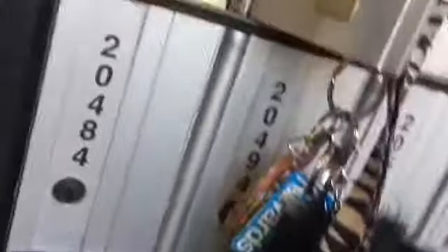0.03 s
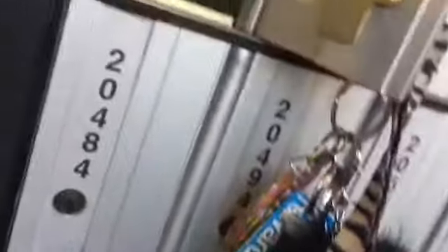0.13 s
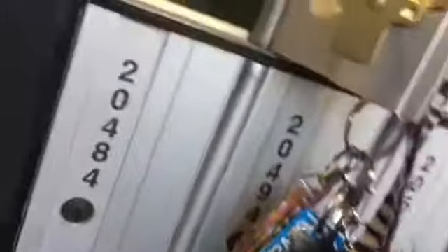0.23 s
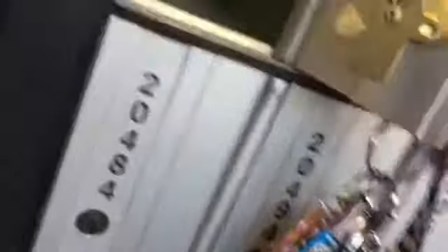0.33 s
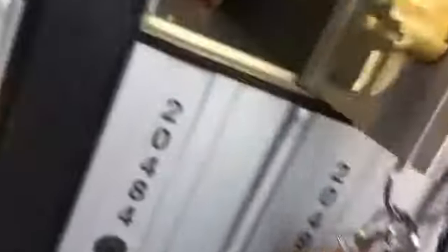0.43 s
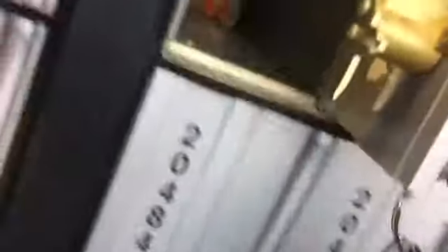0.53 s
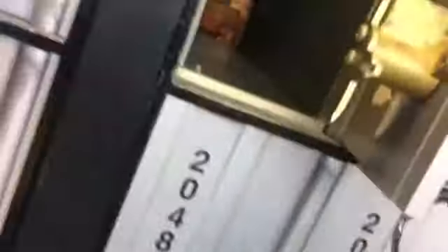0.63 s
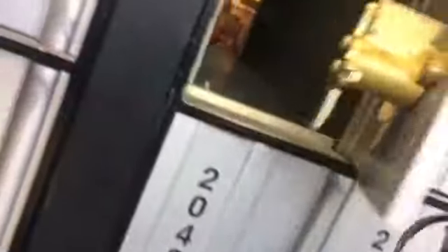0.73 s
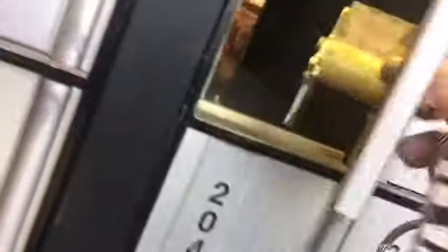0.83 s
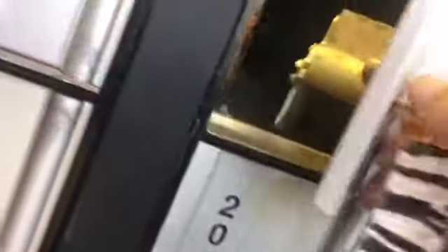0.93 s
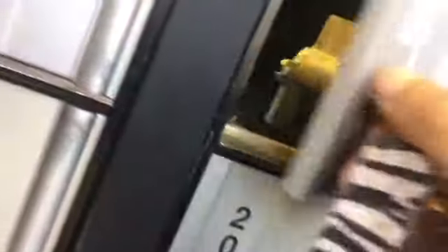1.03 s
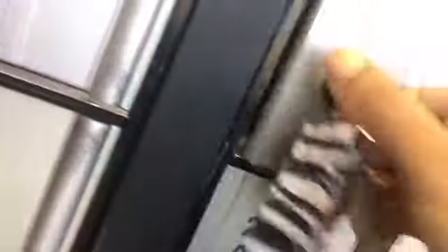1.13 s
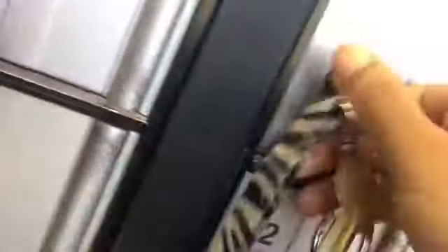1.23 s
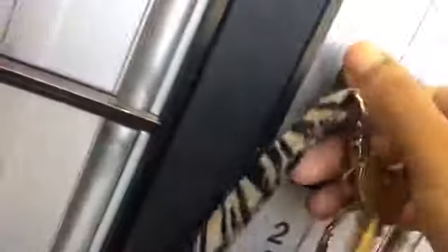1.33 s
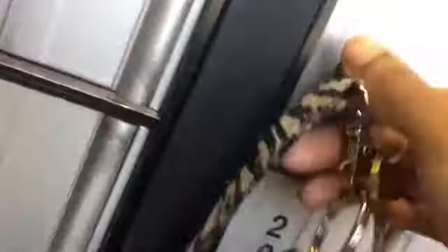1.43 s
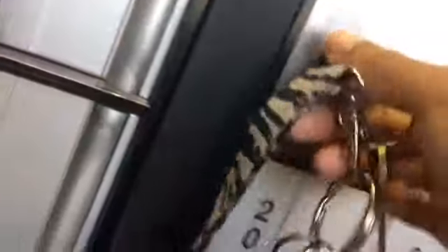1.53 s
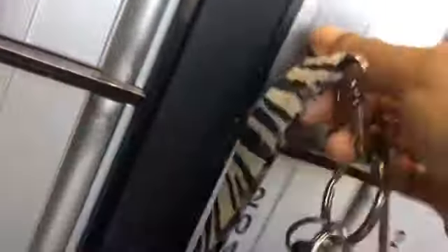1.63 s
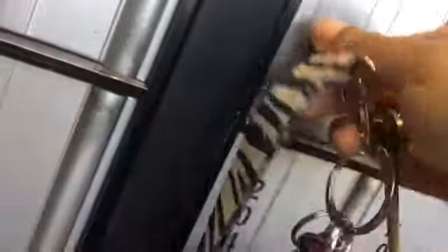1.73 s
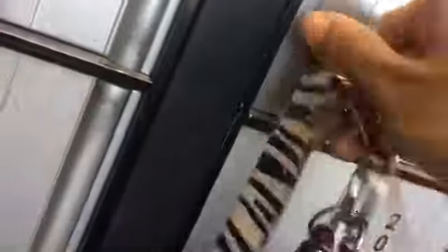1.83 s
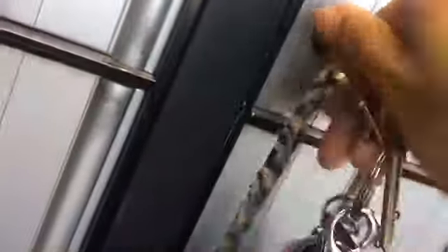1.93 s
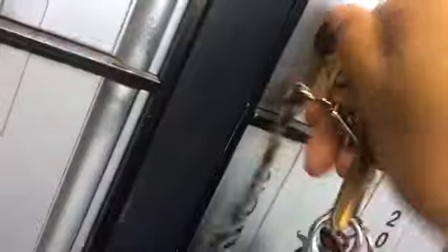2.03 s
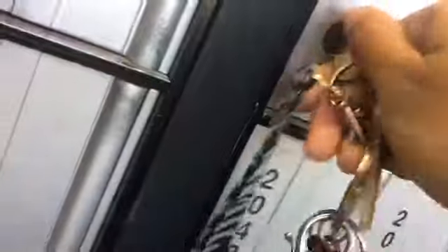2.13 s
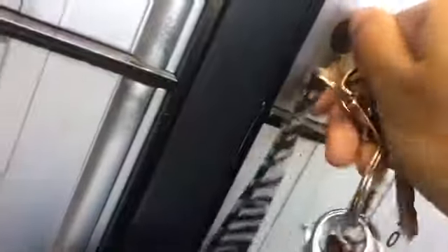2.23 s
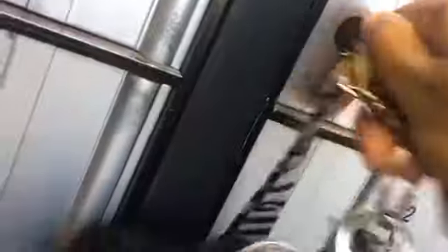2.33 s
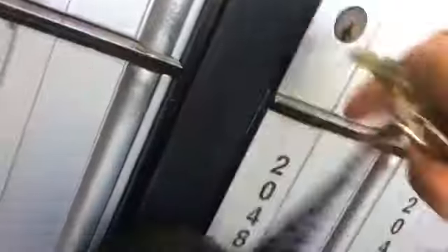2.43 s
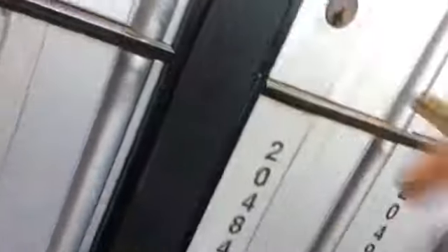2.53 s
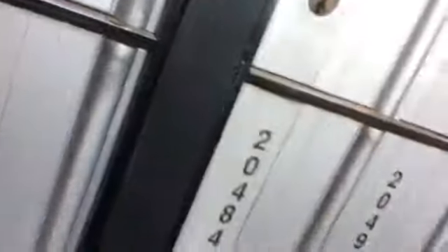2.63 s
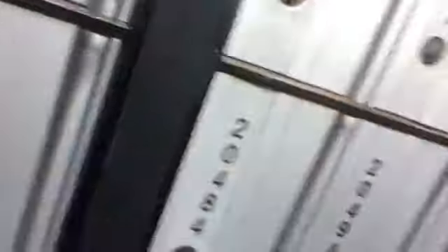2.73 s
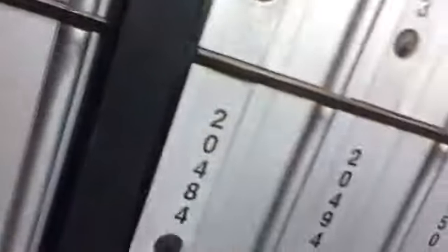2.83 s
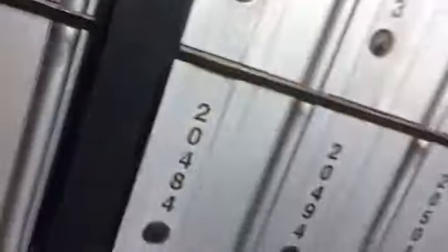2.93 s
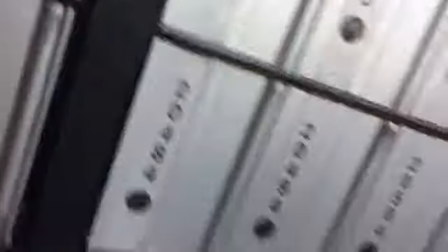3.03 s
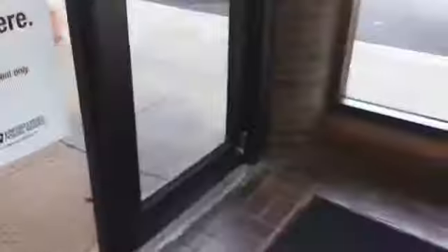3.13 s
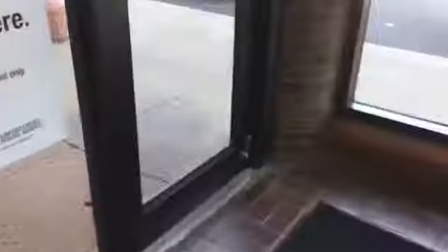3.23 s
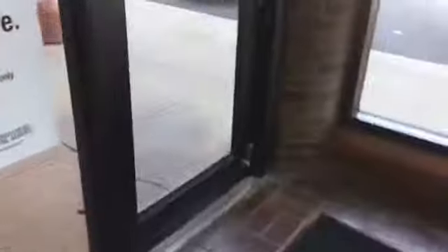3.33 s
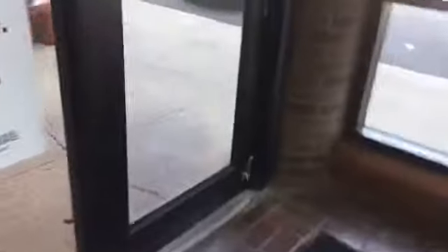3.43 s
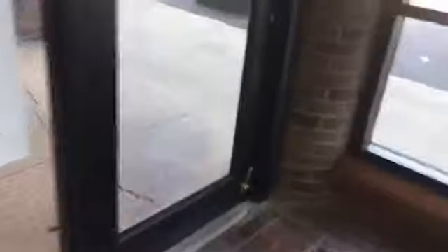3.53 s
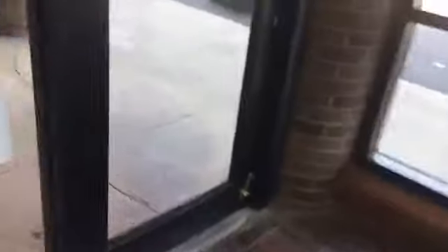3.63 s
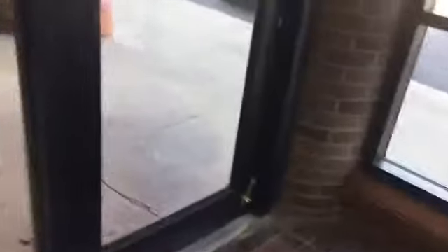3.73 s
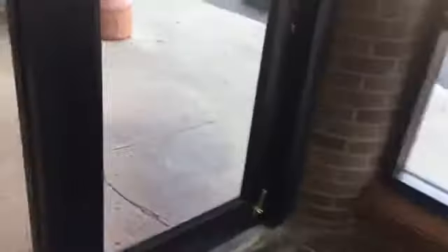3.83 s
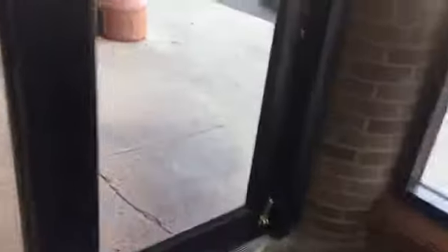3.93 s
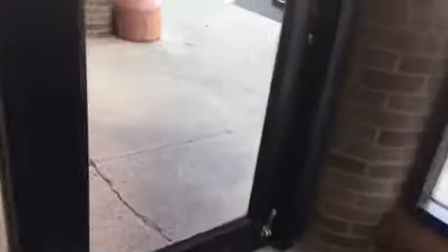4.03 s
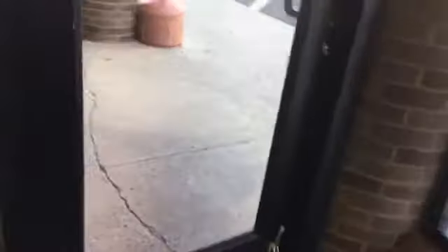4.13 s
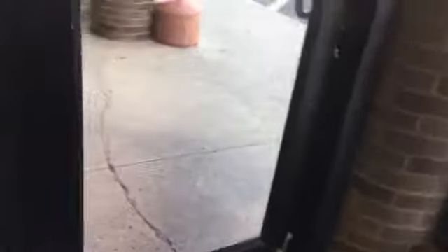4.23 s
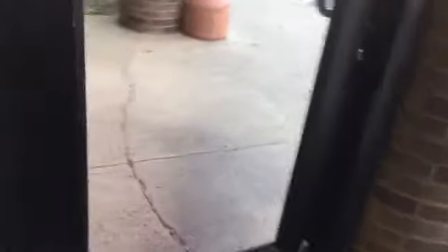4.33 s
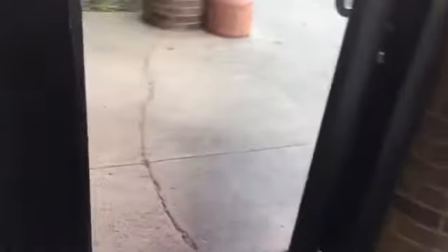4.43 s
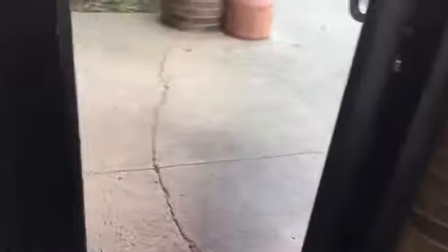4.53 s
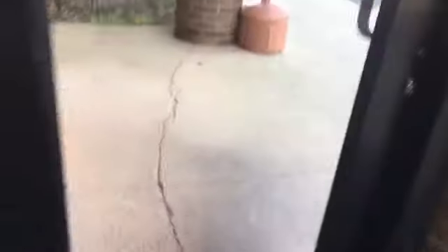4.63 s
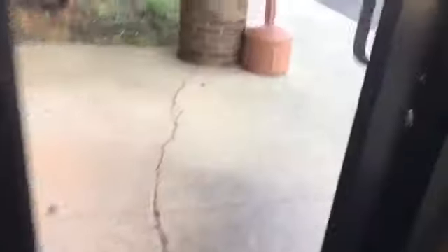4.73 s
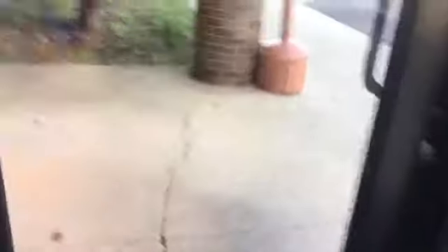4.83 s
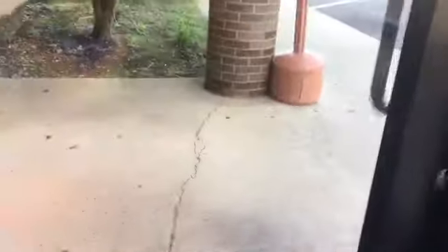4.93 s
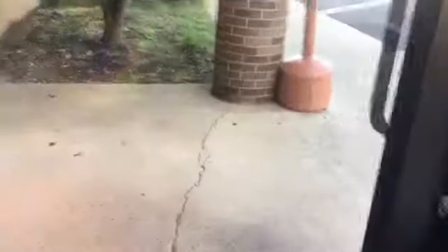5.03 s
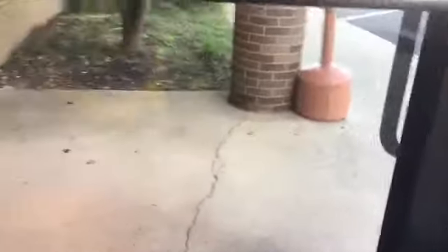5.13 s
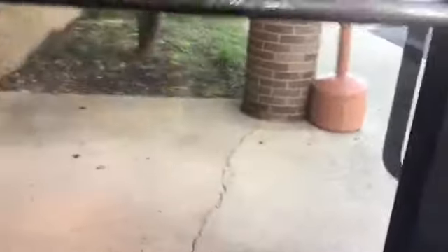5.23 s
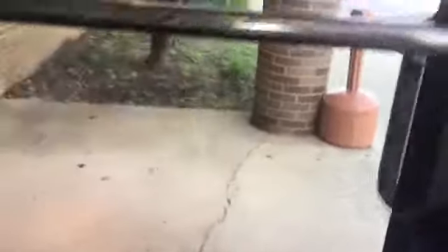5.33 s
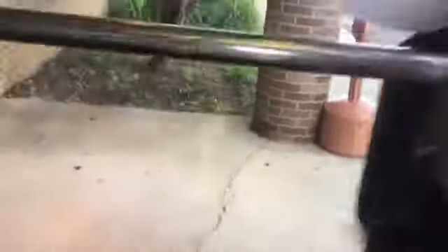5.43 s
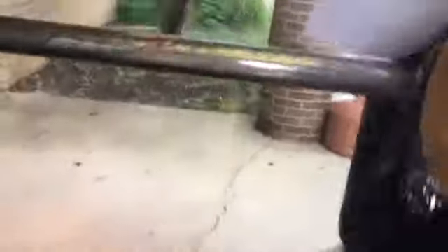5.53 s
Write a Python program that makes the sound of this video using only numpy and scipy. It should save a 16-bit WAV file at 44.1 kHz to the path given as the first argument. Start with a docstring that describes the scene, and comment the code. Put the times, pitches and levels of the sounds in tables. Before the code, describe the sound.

Keys jingle beside a squeaky little metal door that slams shut, then a lock clicks, keys jangle, and soft steps reach a clacking exit door.

```python
"""A small metal mailbox door slams in a tiled lobby; a key turns in its lock and is pulled out, the bunch jingling.
Then soft steps and swishing clothes lead to a glass door, whose bar clacks as it is pushed.
A hand-held phone is close to the keys; ventilation and hum give way to the street, with a low drone.
Metal parts are damped modes plus noisy cracks, rubbing is gritty noise through resonances or colour filters,
air is filtered noise with sine hum, and the hard-walled room is a decaying noise tail."""
import sys
import numpy as np
from scipy import signal
from scipy.fft import rfft, irfft
from scipy.io import wavfile
from scipy.ndimage import uniform_filter1d

SR = 44100
rng = np.random.default_rng(int(sys.argv[2]) if len(sys.argv) > 2 else 0)


def inscribe(sig):
    """Save sig as 16-bit PCM at rate SR to the path in sys.argv[1].

    A 1-D sig is mono; a 2-D sig holds one channel per row.
    Samples are clipped to [-1, 1] before scaling.
    """
    pcm = np.round(np.clip(np.atleast_2d(sig).T, -1, 1) * 32767)
    wavfile.write(sys.argv[1], SR, pcm.astype(np.int16))


N = 246959
TIME = np.arange(N) / SR
RING_TIME = np.arange(SR // 3) / SR
ATTACK = int(.006 * SR)  # samples over which a hit's level is set
THUD_HZ, SPARKLE_HZ = 700, 7000  # the middle range of a hit lies between

# ventilation and street: low f/Hz, high f/Hz, level/dB at the mailboxes, level/dB at the glass door
AIR_BANDS = [(35, 350, -56, -58.5), (346, 3800, -63.5, -66), (3500, 19000, -74.5, -67.5)]
# spectrum of that air: f/Hz, level/dB
AIR_COLOUR = [(15, -41.5), (25, -15), (50, -4.5), (123, -5), (180, -7.5), (229, -9.5), (293, -13),
              (317, -9), (560, -22.5), (1150, -22.5), (1900, -28.5), (2990, -36.5), (3250, -39.5),
              (6380, -47), (16000, -53.5)]
# mains hum by the mailboxes, before it drops toward the door: f/Hz, level/dB
HUM_TONES = [(60, -59), (120, -64), (238, -68.5)]
# how near the glass door is: t/s, nearness (0-1)
NEARNESS = [(0, 0.19), (3.1, 0), (3.2, 0.17), (3.45, .4), (3.6, .9), (5.6, 0.91)]
HUM_DROP_DB = -6.5  # at nearness 1: the hum stays behind by the mailboxes
# a low drone swells outside: t/s, level/dB
DRONE_SWELL = [(3.4, -69), (3.9, -61.5), (4.65, -66), (4.96, -52), (5.1, -66), (5.5, -57), (5.6, -61)]
# decay of the hard-walled lobby: f/Hz, t60/s
LOBBY_T60 = [(100, 1), (500, 0.91), (2000, 0.65), (6000, 0.76), (15000, 0.84)]
# shoes and clothes at each stride: t/s, scuff level/dB, rise/s, t60/s, brightness/dB, swish level/dB
STEPS = [(3.515, -55.5, 0.043, 0.4, 17, -75), (3.62, -57.5, 0.0068, 0.35, 13.5, -63.5),
         (3.742, -53.5, 0.0028, 0.8, 8, -64.5), (4.046, -61, .003, .33, 14, -68),
         (4.205, -63.5, 0.0037, 0.32, 7, -64.5), (4.357, -41.5, .003, 0.33, 1.5, -51.5),
         (4.643, -61, 0.0032, 0.27, -9.5, -54.5), (4.93, -47, .003, 0.32, 2.5, -56.5),
         (5.265, -56, .02, 0.47, 6.5, -55.5), (5.421, -63, 0.013, 0.89, 10.5, -58)]
# spectrum of sole on floor: f/Hz, level/dB
SCUFF_COLOUR = [(60, -10), (200, 2.5), (310, 12), (450, 2.5), (720, 6.5), (950, -1.5), (1500, -2.5),
                (2400, -5.5), (4500, -9.5), (6500, -10), (9500, -12.5), (16000, -17)]
# spectrum of rubbing cloth: f/Hz, level/dB
CLOTH_COLOUR = [(150, -24), (500, -7.5), (800, -1.5), (1200, 1.5), (1700, -3), (2600, -12), (5000, -21.5),
                (9000, -23), (16000, -31.5)]
SWISH_LEAD_S, SWISH_RISE_S, SWISH_HOLD_S, SWISH_T60_S = 0.027, 0.063, 0.087, 0.93
# the glass door's bar clacks under the hand: t/s, level/dB, thud/dB, sparkle/dB
PUSH_BAR = [(4.661, -54, -15, -25.5), (4.7135, -54.5, -19, -19), (5.425, -46, -19.5, -29),
            (5.454, -40.5, -19, 0), (5.59, -35.5, -5.5, -9)]
# modes of the bar: f/Hz, level/dB, t60/s
BAR_MODES = [(438, -10, 0.056), (796, 5, 0.017), (1016, 5, 0.024), (1297, 2, 0.015), (1600, 4, 0.02),
             (2510, -2, 0.018), (2710, -6, 0.02), (3860, -12, 0.013), (5490, -12, 0.014)]
# each hand movement shakes the bunch: t/s of the peak, level/dB before the jingle trim, swell or fade by 1/e /s
SHAKES = [(.71, -64, 0.14), (1.42, -62.5, 0.25), (2.09, -58, 0.17), (2.46, -58.5, 0.095), (2.799, -49, 0.1),
          (3.07, -61.5, 0.052)]
# clearest bright clinks, mostly key on key, just after the slam the rattle of the doors:
# t/s, level/dB, sparkle/dB, ring/dB, which key's modes (0 small, 1 large)
CLINKS = [(0.5603, -46.5, 1.5, 2, 0), (0.6375, -55, 1, -8, 0), (0.681, -54, 3, -2, 0),
          (0.7045, -51, -4, 3, 0), (0.7193, -48, 0, 5, 0), (0.772, -56, -1, 13, 0),
          (0.792, -62, 2, -0.5, 0), (0.822, -58.5, -3, -8.5, 0), (0.975, -52, 7, 7, 0),
          (1.002, -43, -0.5, 8.5, 0), (1.299, -44.5, 6, -27, 0), (1.3228, -41, 7.5, -24, 0),
          (1.3605, -39.5, -10, -16, 0), (1.3898, -63, 6, 3, 0), (1.409, -52, 12.5, -2, 0),
          (1.453, -60, 16, 8, 0), (1.474, -44, 6, 10.5, 0), (2.0661, -41.5, 9, -5, 0),
          (2.655, -61.5, 15.5, -5, 0), (2.695, -55.5, 16.5, 5, 0), (2.7345, -59, 13, 2, 0),
          (2.738, -60, 22, 6, 0), (2.756, -54, 7, -12, 0), (2.7666, -42.5, 11, -6, 0),
          (2.7992, -40.5, 7, 3, 1), (2.813, -45, 10.5, -8, 1), (2.8237, -40, 8.5, -1, 1),
          (2.845, -44, -12, -13, 1), (2.915, -55.5, 10, 0, 1), (3.038, -55.5, 6, -1, 0),
          (3.075, -48, 1, -24, 0)]
# modes of the freely ringing small key: f/Hz, level/dB, t60/s
SMALL_KEY = [(2250, -10, .04), (2900, -14, .03), (4750, -11, .04), (6492, -2, .08), (6620, -8, .06),
             (7332, -9, .1), (9400, -10, .05), (11120, -2, .11), (12030, 0, .12), (12170, -6, .08),
             (14600, -3, .13)]
# modes of the large key, before damping: f/Hz, level/dB, t60/s
LARGE_KEY = [(2600, 5, 0.032), (4600, -16, .025), (5900, 0, 0.038), (6840, -2, 0.055), (8700, -1, .05),
             (9260, -5, 0.051), (8840, 2, .07), (10100, -21, 0.046), (12200, -8, .06), (14400, 0, .07),
             (14270, 2, 0.057), (15700, -9, .05)]
# the blade rubs in the keyway as it is turned, then pulled out: start t/s, length/s, level/dB
KEY_RUBS = [(1.985, 0.14, -59), (2.012, 0.026, -38), (2.046, 0.012, -35), (2.372, 0.079, -40.5),
            (2.474, 0.022, -45)]
# resonances of the keyway: f/Hz, width/Hz, level/dB
KEYWAY = [(833, 71, 6.5), (1340, 150, 2.5), (1764, 94, 7), (2320, 400, 3.5), (3200, 270, -4),
          (4000, 140, -9), (5460, 400, 1), (6030, 120, -3.5), (8950, 430, -22), (13200, 2900, -13)]
# the sprung pins tick while the key works in the lock: start t/s, length/s, level/dB
PIN_TICKS = [(1.998, .135, -50.5), (2.388, 0.055, -45), (2.52, .04, -56.5)]
PIN_TICKS_PER_S = 50
# clicks of lock and key, with a few bright jingles of the keys among them:
# t/s, level/dB before the lock trim, thud/dB, sparkle/dB
LOCK_CLICKS = [(1.8833, -46, 2, 8.5), (1.902, -43.5, 1.5, -25), (1.924, -26.5, -21, -2),
               (1.9657, -30, -22, -9), (1.987, -29, -15, -10), (1.995, -42, -12, 2),
               (2.0215, -40.5, -4, -12), (2.0375, -33.5, -11, -24), (2.054, -23.5, -4.5, -27),
               (2.058, -35, -1.5, -22), (2.1084, -48.5, -8, 11), (2.1208, -45.5, -1, -4),
               (2.1429, -27.5, -33, 2), (2.1616, -43.5, 1.5, -5), (2.294, -49.5, -11, -12),
               (2.304, -50.5, -14.5, -9.5), (2.3265, -43.5, -25, -14.5), (2.394, -38, -10, -1),
               (2.416, -34.5, -12.5, -6), (2.4306, -36, -16, 1), (2.4886, -42.5, -5, 10.5),
               (2.5018, -53, -10, 18), (2.5055, -51, -10, 21), (2.515, -44, 2, 5)]
# modes of the lock barrel: f/Hz, level/dB, t60/s
LOCK_MODES = [(234, -2.5, 0.038), (307, -8.5, 0.053), (686, -14, 0.085), (817, -13, 0.13),
              (956, -1.5, 0.023), (1280, -11.5, 0.053), (1945, -8, 0.026), (2090, -5, 0.022),
              (2560, -1.5, 0.038), (3360, -7.5, 0.025), (4540, -2, 0.026), (5640, 4.5, 0.017),
              (5870, -15, 0.011), (5780, 11, 0.0085), (7330, 1, 0.0054), (9220, 9.5, 0.015),
              (12200, 8, 0.012), (12500, -11, 0.0081)]
# the hinge pin whispers while the door swings freely: start t/s, length/s, level/dB
HINGE_SWING = [(.43, 0.166, -66), (1.084, .16, -60)]
# resonances at the pin: f/Hz, width/Hz, level/dB
PIN_RESONANCES = [(3600, 600, -1.5), (5800, 600, 1), (7200, 1500, -5), (9500, 400, -2)]
# the hinge drags as the door is moved: start t/s, length/s, level/dB
HINGE_DRAG = [(0.387, 0.11, -60), (0.615, .13, -55)]
# resonances the dragging hinge sounds: f/Hz, width/Hz, level/dB
HINGE_RESONANCES = [(467, 54, 7.5), (800, 150, -9.5), (1382, 790, -9.5), (2613, 1000, -17.5),
                    (6000, 3000, -27.5)]
# the loose door knocks on its hinge: t/s, level/dB, thud/dB, sparkle/dB,
# f/Hz that the contact point favours, f/Hz above which a soft contact falls off
KNOCKS = [(0.3393, -48.5, -6.5, -1, 1820, 12000), (0.3878, -41.5, -4, -20, 802, 5000),
          (.4245, -46, -5, -23, 854, 3000), (0.681, -54, -3.5, -3, 2595, 9000),
          (.719, -55.5, 7, 2.5, 480, 9000), (1.1642, -42.5, -8.5, -27, 800.5, 1000),
          (1.232, -54, -1, -7, 2990, 10000), (1.625, -53, -7, -1.5, 1198, 9000)]
# modes of door and hinge, before the contact point favours some: f/Hz, level/dB, t60/s
HINGE_MODES = [(475, -4.5, 0.18), (657, -1, 0.094), (800, -1, 0.048), (843, -10, 0.081), (1260, -3, 0.042),
               (1810, -2.5, .04), (2180, -3, .05), (2747, -4.5, 0.035), (3200, -4.5, 0.03),
               (5940, -12, .03)]
# the door hits its frame and rebounds: t/s, level/dB, thud/dB, sparkle/dB
SLAM = [(1.254, -9.5, -14.5, -9.5), (1.2578, -19.5, -9.5, -3), (1.265, -27.5, -12, -14),
        (1.2705, -21.5, 0, -13), (1.2778, -37, -9, -11.5), (1.295, -42.5, -2, 2)]
# long modes of the door and the bank of boxes: f/Hz, level/dB, t60/s
DOOR_MODES = [(238, -8.5, 0.13), (349, -3.5, .14), (645, -9, .11), (1057, -12, 0.072), (1270, -4, 0.089),
              (1400, -4.5, .06), (1553, -5.5, .09), (1730, 2.5, .07), (1827, -5, .08), (2035, -9, 0.057),
              (2215, -3, 0.08), (2343, -2.5, 0.1), (2548, -1, .07), (2657, -1, .08), (2870, -3.5, 0.014),
              (3020, -13.5, .07), (3460, -6, 0.055), (3560, -2.5, 0.042), (4250, 2.5, 0.052),
              (4100, 2.5, 0.056), (4700, -14, .06), (5230, -12, .06), (5510, -2.5, .05), (5830, -2, 0.068),
              (6760, -10.5, .045), (8600, -6.5, .06), (9220, 1.5, .045), (9480, -8, .03),
              (12850, -5.5, 0.046)]
# spectrum of the dense panel modes: f/Hz, level/dB
DOOR_COLOUR = [(35, 0), (62, 0.5), (100, -9.5), (170, 6), (230, -2), (320, 1.5), (420, -7), (650, -3),
               (980, -7), (1300, 1), (1700, -2), (2800, -1.5), (4500, -4), (5800, -4), (7600, -14.5),
               (9300, -11.5), (16000, -19.5)]
# colour of the phone microphone: f/Hz, level/dB
MICROPHONE = [(1000, 1), (2800, 2), (4200, 1), (4900, -1), (5500, 2), (6300, 1.5), (7600, -0.5), (9000, 1),
              (14000, -1), (16000, -3)]
TOP_HZ = 15900  # the treble is cut above
DIP_S, DIP_DB, DIP_FALL_S, DIP_RECOVER_S = 3.131, -24, .009, .011  # one brief dip in level


def undb(db):
    """Decibels to gain."""
    return 10 ** (np.asarray(db) / 20)


def unit(x):
    """Scale to rms 1."""
    return x / np.sqrt(np.mean(x ** 2) + 1e-20)


def unit_attack(x):
    """Scale a hit so that its first milliseconds have rms 1."""
    return x / np.sqrt(np.mean(x[:ATTACK] ** 2) + 1e-20)


def on_log(hz, points):
    """Read (f/Hz, value) points on a log-frequency axis."""
    f, value = np.transpose(points)
    return np.interp(np.log(np.maximum(hz, 1)), np.log(f), value)


def colour(x, points):
    """Causal filter with the given (f/Hz, level/dB) shape, from the cepstrum of its log gain."""
    size = 4096
    gain = undb(on_log(np.fft.rfftfreq(size, 1 / SR), points))
    cepstrum = irfft(np.log(gain))
    # folding the cepstrum onto positive time gives minimum phase
    cepstrum[1:size // 2] *= 2
    cepstrum[size // 2 + 1:] = 0
    impulse = irfft(np.exp(rfft(cepstrum)))
    return signal.fftconvolve(x, impulse)[:len(x)]


def band(x, hz, kind, order=3):
    """Butterworth filter."""
    sos = signal.butter(order, np.minimum(hz, .45 * SR), kind, fs=SR, output="sos")
    return signal.sosfilt(sos, x)


def walk(rate):
    """Smooth random wandering of rms 1, with a new target value rate times a second."""
    k = int(SR / rate)
    targets = np.repeat(rng.standard_normal(N // k + 1), k)
    return unit(uniform_filter1d(targets, k)[:N])


def grit(size, spread_db):
    """Dense tiny contacts of very uneven strength."""
    strength_db = spread_db * np.repeat(rng.standard_normal(size // 20 + 1), 20)[:size]
    return unit(rng.standard_normal(size) * undb(strength_db))


def curve(rows):
    """Gain that follows (t/s, level/dB) rows, practically silent outside them."""
    s, db = np.transpose(rows)
    return undb(np.interp(TIME, s, db, left=-120, right=-120))


def stroke(start, length, db, rise_s, t60):
    """Gain of one sliding movement: it builds, holds until its length is over, then dies away."""
    since = TIME - start
    fade = 1000 ** (-np.maximum(since - length, 0) / t60)
    return undb(db) * np.clip(since / rise_s, 0, 1) * fade


def resonate(x, peaks):
    """Parallel (f/Hz, width/Hz, level/dB) resonances, scaled to rms 1."""
    return unit(sum(undb(db) * signal.lfilter(*signal.iirpeak(hz, hz / width, fs=SR), x)
                    for hz, width, db in peaks))


def fading_noise(t, t60_points):
    """Countless modes: octave bands of noise, each with its own decay."""
    edges = 30 * 2. ** np.arange(11)
    spectrum = rfft(rng.standard_normal(len(t)))
    hz = np.fft.rfftfreq(len(t), 1 / SR)
    out = np.zeros(len(t))
    for lo, hi in zip(edges, edges[1:]):
        octave = irfft(spectrum * ((hz >= lo) & (hz < hi)), len(t))
        out += octave * 1000 ** (-t / on_log(np.sqrt(lo * hi), t60_points))
    return out


def ring(modes, scatter_db, detune=.002):
    """Damped modes; each contact point excites and loads them a little differently."""
    hz, db, t60 = np.transpose(modes)[:, :, None]
    hz = hz * (1 + detune * rng.standard_normal(hz.shape))
    gain = undb(db + scatter_db * rng.standard_normal(hz.shape)) * rng.choice([-1, 1], hz.shape)
    decay = np.exp(-np.log(1000) * RING_TIME / t60)
    return unit_attack(np.sum(gain * np.sin(2 * np.pi * hz * RING_TIME) * decay, axis=0))


def crack(t60, rattle_db, rattle_t60, patchy_db=4):
    """The brief noise of a contact and the fainter buzz after it; every contact has its own colour."""
    envelope = 1000 ** (-RING_TIME / t60) + undb(rattle_db) * 1000 ** (-RING_TIME / rattle_t60)
    hz = np.linspace(300, 16000, 24)
    patches = np.c_[hz, patchy_db * rng.standard_normal(len(hz))]
    return unit_attack(colour(rng.standard_normal(len(RING_TIME)), patches) * envelope)


def voice_hit(hit, db, thud_db, sparkle_db):
    """A heavy contact adds thud and a hard one sparkle, both relative to the middle range."""
    thud = band(hit, [THUD_HZ / 20, THUD_HZ], "bandpass")
    thud = thud / np.sqrt(np.sum(thud ** 2) / (2 * ATTACK))  # lows build slowly, so their whole ring counts
    middle = unit_attack(band(hit, [THUD_HZ, SPARKLE_HZ], "bandpass"))
    sparkle = unit_attack(band(hit, SPARKLE_HZ, "highpass"))
    return undb(db) * (middle + undb(thud_db) * thud + undb(sparkle_db) * sparkle)


def add(track, s, sound):
    """Mix a sound into the track at a time."""
    i = int(s * SR)
    track[i:i + len(sound)] += sound[:N - i]


def strikes(rows, modes, crack_db, crack_t60, rattle_db, rattle_t60, scatter_db, detune):
    """Blows on one metal part: a crack and the part's modes, which shift from blow to blow."""
    out = np.zeros(N)
    onset = 1 - np.exp(-RING_TIME / .0003)
    for s, db, thud_db, sparkle_db in rows:
        hit = ring(modes, scatter_db, detune) + undb(crack_db) * crack(crack_t60, rattle_db, rattle_t60)
        add(out, s, voice_hit(hit * onset, db, thud_db, sparkle_db))
    return out


def chatter(hit, gap_s, bounce_db, count=4):
    """Light parts touch again a few times, at uneven gaps and ever more weakly."""
    out = hit.copy()
    for k, s in enumerate(np.cumsum(gap_s * rng.uniform(.3, 1.7, count))):
        later = np.pad(hit, (int(s * SR), 0))[:len(hit)]
        # the first bounce is already four steps of bounce_db down
        out += undb((k + 4.0) * bounce_db) * rng.choice([-1, 1]) * later
    return out


def air(flicker_db=2.9):
    """Ventilation rumble and mains hum give way to the street near the glass door."""
    nearness = np.interp(TIME, *np.transpose(NEARNESS))
    hum = np.zeros(N)
    for hz, db in HUM_TONES:
        level = undb(db + 2 * walk(11.0)) * np.sqrt(2)
        hum += level * np.sin(2 * np.pi * hz * TIME + .5 * walk(8.9))
    out = undb(HUM_DROP_DB * nearness) * hum
    for low_hz, high_hz, inside_db, door_db in AIR_BANDS:
        noise = colour(rng.standard_normal(N), AIR_COLOUR)
        noise = unit(band(noise, [low_hz, high_hz], "bandpass"))
        level_db = inside_db + (door_db - inside_db) * nearness
        out += noise * undb(level_db + flicker_db * walk(12))
    return out


def drone(hz=76, waver=0.033):
    """A low tone from the street, wavering in pitch and level."""
    phase = 2 * np.pi * np.cumsum(hz * (1 + waver * walk(7.3))) / SR
    return curve(DRONE_SWELL) * np.sqrt(2) * np.sin(phase) * undb(1.5 * walk(14))


def lobby(x, wet_db=-17, build_s=.006, wander=2.5):
    """Hard walls answer with a diffuse tail; the moving phone drifts between two sets of echo paths."""
    t = TIME[:SR]
    place = wander * walk(30)  # radians
    walls = [(100, -3.5), (500, 1.0), (1500, -0.5), (2700, -2.5), (4500, -3), (9000, -7), (16000, -4)]
    out = np.zeros(N)
    for share in (np.cos(place), np.sin(place)):
        tail = fading_noise(t, LOBBY_T60) * (1 - np.exp(-t / build_s))
        tail = colour(tail / np.sqrt(np.sum(tail ** 2)), walls)
        out += share * signal.fftconvolve(x, tail)[:N]
    return undb(wet_db) * out


def cloth(flutter_db=1.5):
    """Fibres slide over each other in a swish that starts just before every step."""
    fibres = unit(colour(grit(N, spread_db=2.5), CLOTH_COLOUR)) * undb(flutter_db * walk(41))
    swishes = sum(stroke(s - SWISH_LEAD_S, SWISH_HOLD_S, db, SWISH_RISE_S, SWISH_T60_S)
                  for s, *_, db in STEPS)
    return fibres * swishes


def steps():
    """Gritty soles land and slide on the hard floor."""
    out, t = np.zeros(N), TIME[:SR]
    for s, db, rise_s, t60, bright_db, _ in STEPS:
        sole = unit(colour(grit(SR, spread_db=4.0), SCUFF_COLOUR))
        sole = sole + (undb(bright_db) - 1) * band(sole, 3900, "highpass", order=1)
        add(out, s, undb(db) * sole * (1 - np.exp(-t / rise_s)) * 1000 ** (-t / t60))
    return out


def push_bar():
    """The exit door's bar clacks; the hand muffles its upper ring."""
    bar = strikes(PUSH_BAR, BAR_MODES, crack_db=4, crack_t60=0.013, rattle_db=-9, rattle_t60=0.067,
                  scatter_db=3.5, detune=0.035)
    muffling = [(300, -4), (1500, 4), (2600, -2.0), (4500, -4), (7000, 0), (10000, -4.5), (16000, -11)]
    return colour(bar, muffling)


def sway(count=700, gain_db=1, spread_db=5.5, key_ring_db=-11):
    """Ring, clasp and charms touch at random while the bunch is shaken; the small key rings along."""
    out = np.zeros(N)
    motion = sum(undb(db) * np.exp(-((TIME - s) / width) ** 2) for s, db, width in SHAKES)
    first = SHAKES[0][0] - 2 * SHAKES[0][2]
    last = SHAKES[-1][0] + 2 * SHAKES[-1][2]
    t = RING_TIME[:SR // 30]
    for when, pitch, size in rng.uniform(0, 1, (count, 3)):
        s = first + when * (last - first)
        partials = (2500 + 4500 * pitch) * np.array([[1], [1.8], [2.3]])
        tone = np.sin(2 * np.pi * partials * t).sum(axis=0) * 1000 ** (-t / 0.009)
        noise = 2 * rng.standard_normal(len(t)) * 1000 ** (-t / 0.014)
        strength = undb(spread_db * (-np.log(1 - .95 * size) - 1))  # many weak touches, few strong
        add(out, s, unit_attack(tone + noise) * motion[int(s * SR)] * strength)
    key = ring(SMALL_KEY, scatter_db=2.5)
    out = out + undb(key_ring_db) * signal.fftconvolve(out, key / np.linalg.norm(key))[:N]
    return undb(gain_db) * band(out, 3000, "highpass", order=2)


def clinks(ring_db=-2, thud_db=-22, rise_s=0.00032):
    """Each bright clink is a tick and the damped ring of one key's modes, with a few weak bounces."""
    out = np.zeros(N)
    onset = 1 - np.exp(-RING_TIME / rise_s)
    for s, db, sparkle_db, free_db, which in CLINKS:
        damping = rng.uniform(.35, .75)  # neighbouring keys shorten every t60
        modes = np.array(LARGE_KEY if which > .5 else SMALL_KEY) * [1, 1, damping]
        tick = crack(t60=.007, rattle_db=-19, rattle_t60=.04)
        tick = unit_attack(band(tick, 1900, "highpass", order=2))
        tone = undb(ring_db + free_db) * ring(modes, scatter_db=2.0, detune=0.00082)
        clink = chatter((tick + tone) * onset, gap_s=0.0044, bounce_db=-4)
        add(out, s, voice_hit(clink, db, thud_db, sparkle_db))
    return out


def key_rub(hiss_db=-7, catch_db=3.5, rise_s=0.029, t60=0.094):
    """The toothed blade catches and grates past the pins and rings the lock barrel."""
    friction = grit(N, spread_db=5.5) * undb(catch_db * walk(250))
    pressure = sum(stroke(*row, rise_s, t60) for row in KEY_RUBS)
    hiss = undb(hiss_db) * band(friction, 720, "highpass")
    return pressure * (resonate(friction, KEYWAY) + hiss)


def pins(spread_db=3, thud_db=-14, sparkle_db=4):
    """Light, bright ticks of the pins, spread unevenly over each movement of the key."""
    rows = []
    for start, length, db in PIN_TICKS:
        slots = np.arange(start, start + length, 1 / PIN_TICKS_PER_S)
        times = slots + rng.random(len(slots)) / PIN_TICKS_PER_S
        rows += [(s, db + spread_db * rng.standard_normal(), thud_db, sparkle_db) for s in times]
    return strikes(rows, LOCK_MODES, crack_db=7, crack_t60=0.0045, rattle_db=-34, rattle_t60=0.051,
                   scatter_db=7, detune=0.082)


def lock(gain_db=-1.5):
    """Clicks of lock and key and a few bright jingles, all voiced as cracks with the lock barrel's modes."""
    clicks = strikes(LOCK_CLICKS, LOCK_MODES, crack_db=4, crack_t60=0.0099, rattle_db=-24.5,
                     rattle_t60=0.15, scatter_db=3, detune=0.026)
    return undb(gain_db) * clicks


def hinge_swing(t60=.15):
    """Fine friction at the pin, growing as the door gathers speed."""
    speed = sum(stroke(start, length, db, length, t60) for start, length, db in HINGE_SWING)
    return speed * resonate(grit(N, spread_db=3), PIN_RESONANCES)


def hinge_drag(catch_db=3, rise_s=0.039, t60=0.38):
    """The dry hinge sticks and slips, sounding the door panel."""
    pressure = sum(stroke(*row, rise_s, t60) for row in HINGE_DRAG)
    friction = grit(N, spread_db=3.5) * undb(catch_db * walk(83))
    return pressure * resonate(friction, HINGE_RESONANCES)


def knocks(focus_db=7):
    """Each knock rings mostly the modes near its favoured pitch; the others fall by focus_db an octave."""
    out = np.zeros(N)
    for *blow, pitch, soft_hz in KNOCKS:
        modes = [(hz, db - focus_db * abs(np.log2(hz / pitch)), t60) for hz, db, t60 in HINGE_MODES]
        knock = strikes([blow], modes, crack_db=0.5, crack_t60=0.014, rattle_db=-15.0, rattle_t60=.06,
                        scatter_db=3.5, detune=0.026)
        out += band(knock, soft_hz, "lowpass", order=2)
    return out


def rattle(db=-44, t60=0.72, rise_s=.03, chatter_db=6, chatter_hz=110, treble_db=-10):
    """The slam sets the neighbouring doors chattering in their frames."""
    contacts = unit(grit(N, spread_db=6) * undb(chatter_db * walk(chatter_hz)))
    treble = undb(treble_db) * band(contacts, 4000, "highpass")
    buzz = unit(colour(contacts, DOOR_COLOUR)) + treble
    return stroke(SLAM[0][0], rise_s, db, rise_s, t60) * buzz


def slam(modes_db=-6):
    """The door chatters against one spot of its frame; dense panel modes die fast, a few ring on."""
    out = np.zeros(N)
    long_modes = ring(DOOR_MODES, scatter_db=1, detune=0)  # the same at every contact
    panel_t60 = [(100, .08), (400, 0.05), (1500, 0.059), (5000, 0.035), (12000, 0.029)]
    for s, db, thud_db, sparkle_db in SLAM:
        panel = unit_attack(colour(fading_noise(RING_TIME, panel_t60), DOOR_COLOUR))
        add(out, s, voice_hit(panel + undb(modes_db) * long_modes, db, thud_db, sparkle_db))
    return out


def scene(near_room_db=-6):
    """Mailbox, keys, steps and exit door; the small parts are close to the phone and stir the room less."""
    doors = slam() + rattle() + knocks() + hinge_drag() + hinge_swing() + push_bar()
    near = lock() + pins() + clinks() + sway() + key_rub()
    room = lobby(doors + undb(near_room_db) * near)
    background = steps() + cloth() + air() + drone()
    return (doors + near + room + background)[None]


def record(dry):
    """The microphone colours the sound, the level dips briefly once, peaks are rounded and the top is cut."""
    since = TIME - DIP_S
    dip = np.clip(1 + since / DIP_FALL_S, 0, 1) * np.exp(-np.maximum(since, 0) / DIP_RECOVER_S)
    heard = colour(dry[0], MICROPHONE) * undb(DIP_DB * dip)
    top_cut = signal.ellip(8, .2, 70, TOP_HZ, fs=SR, output="sos")
    return signal.sosfilt(top_cut, np.tanh(heard))[None]


dry = scene()
out = record(dry)
inscribe(out)
```